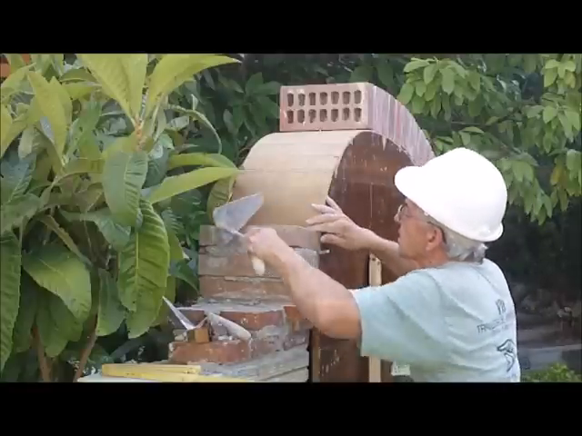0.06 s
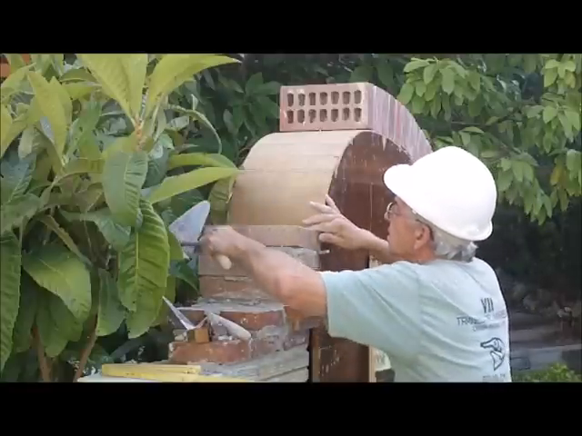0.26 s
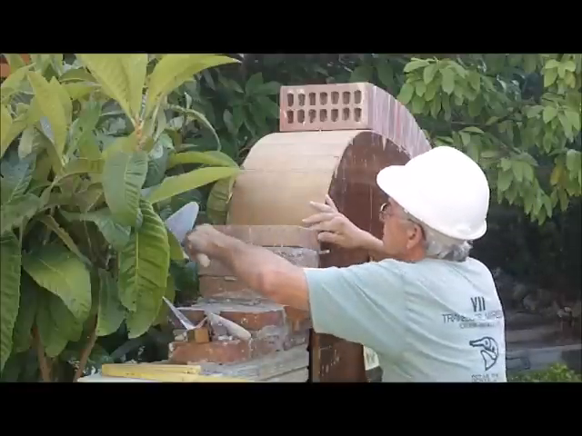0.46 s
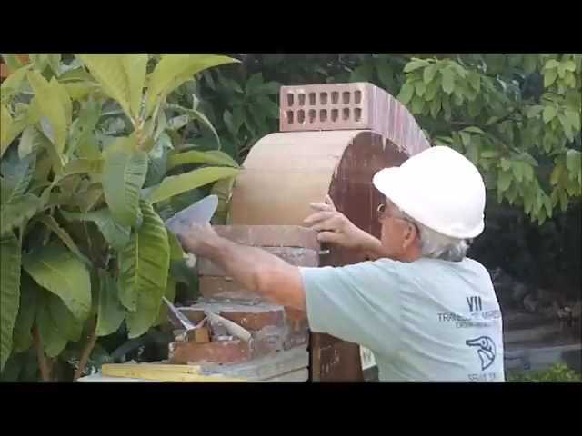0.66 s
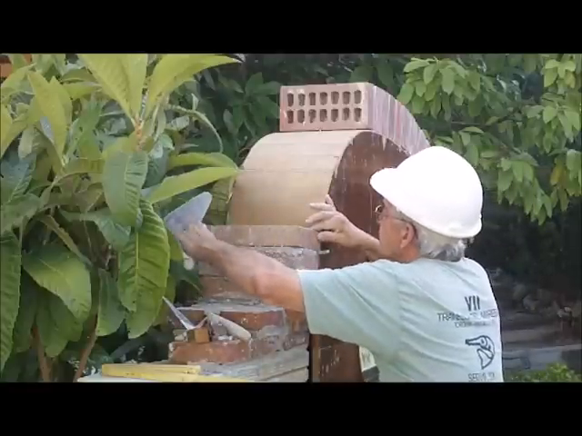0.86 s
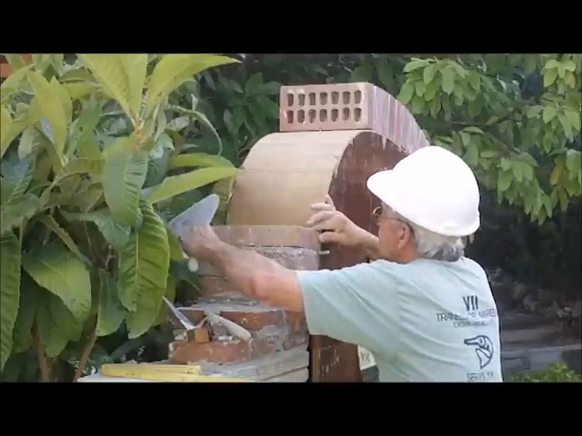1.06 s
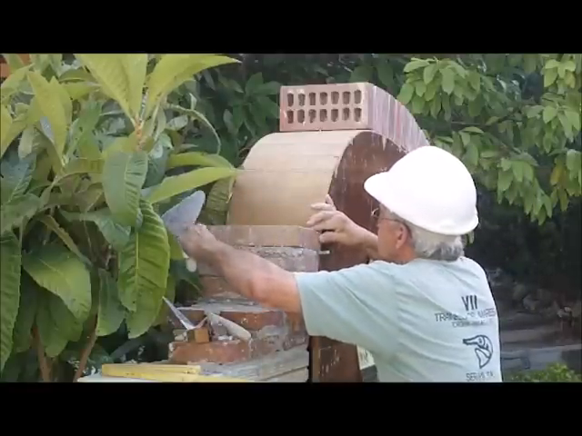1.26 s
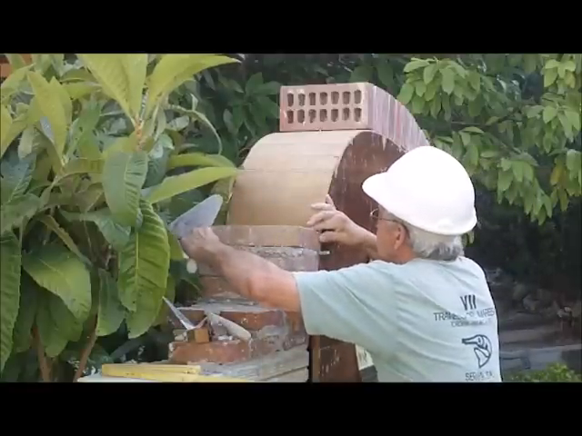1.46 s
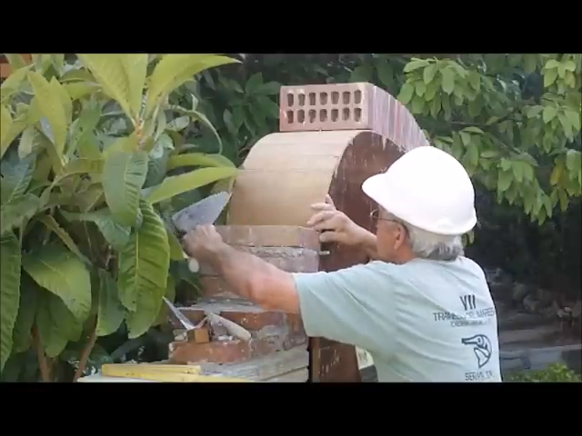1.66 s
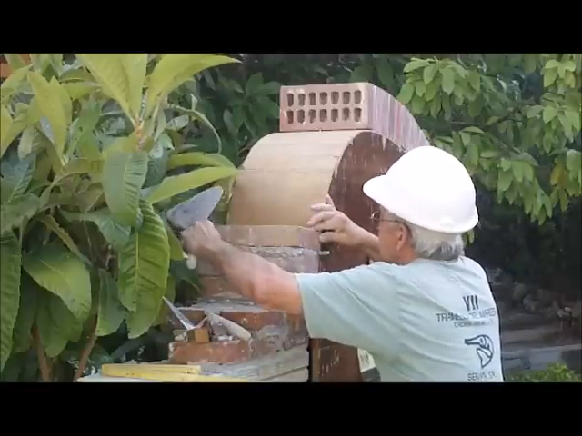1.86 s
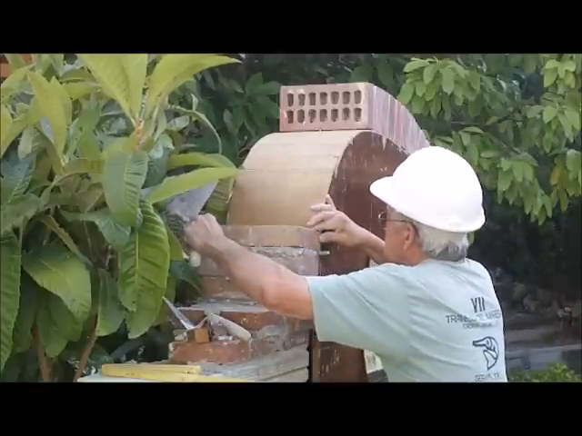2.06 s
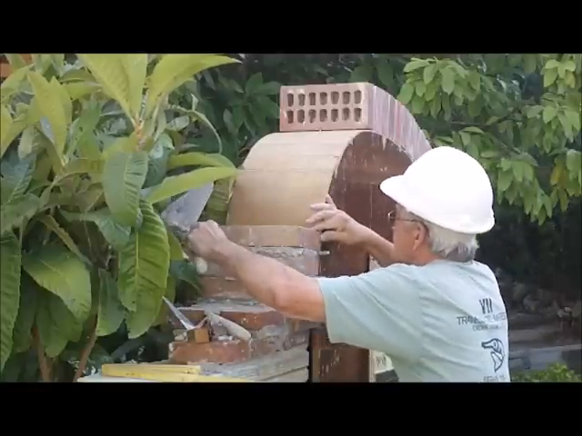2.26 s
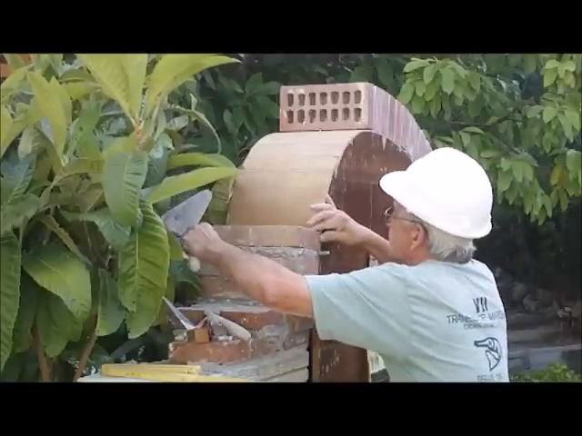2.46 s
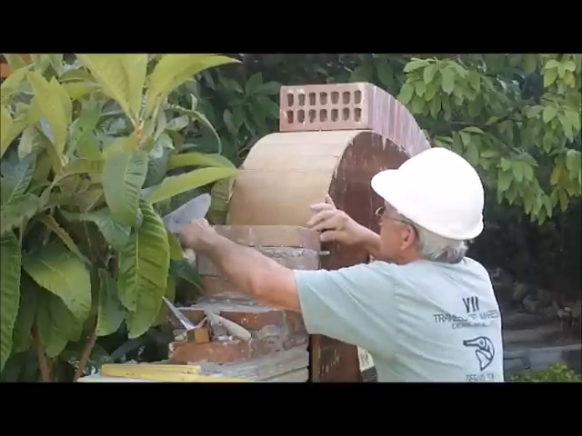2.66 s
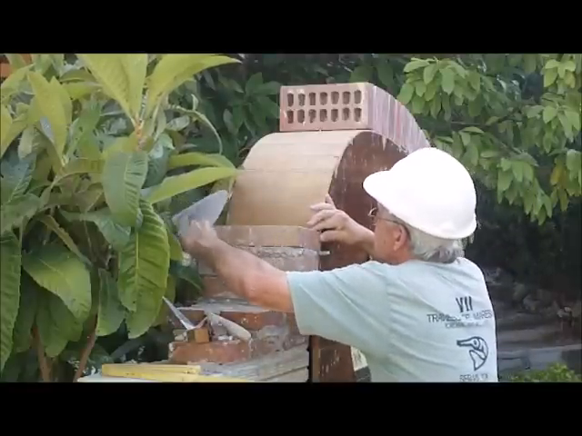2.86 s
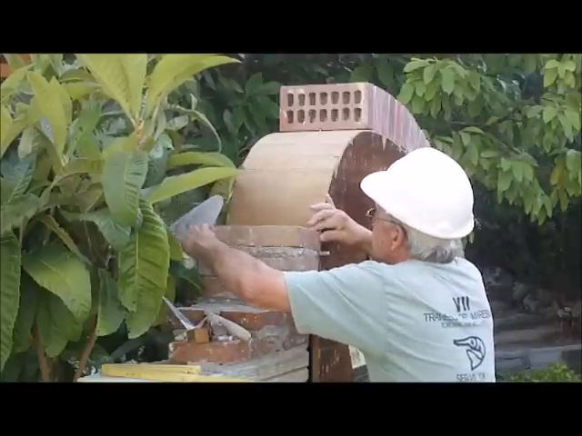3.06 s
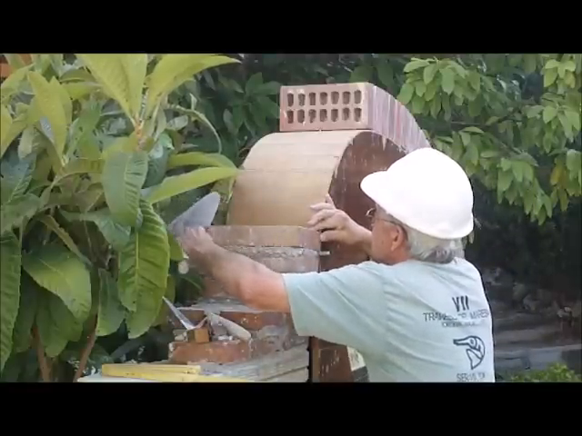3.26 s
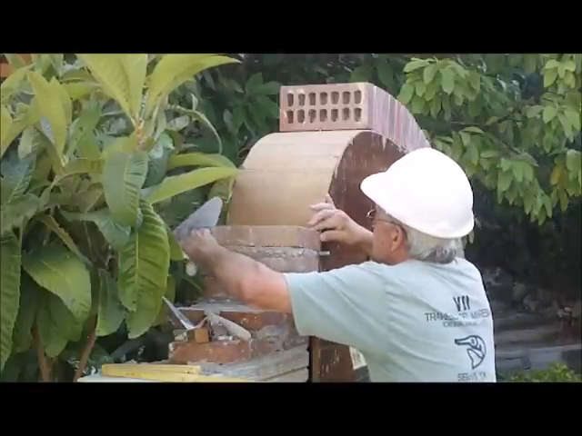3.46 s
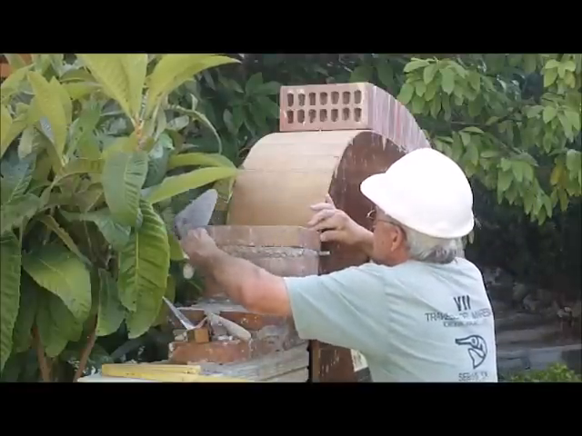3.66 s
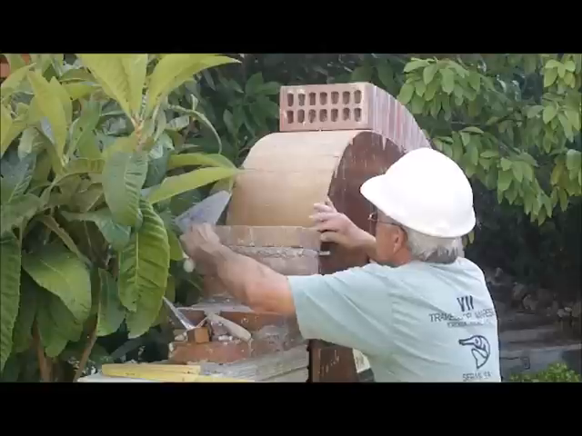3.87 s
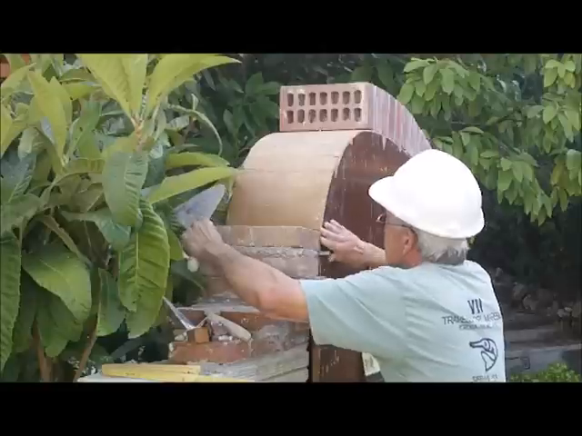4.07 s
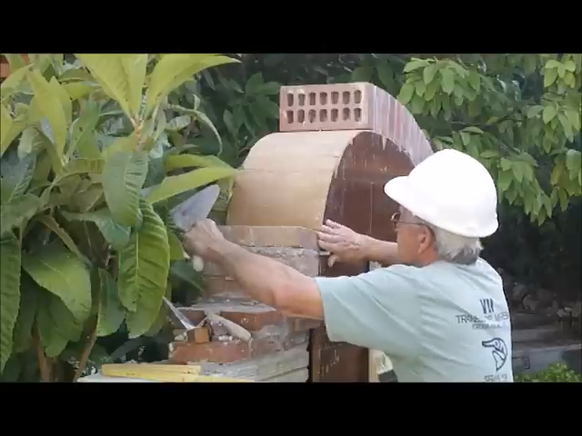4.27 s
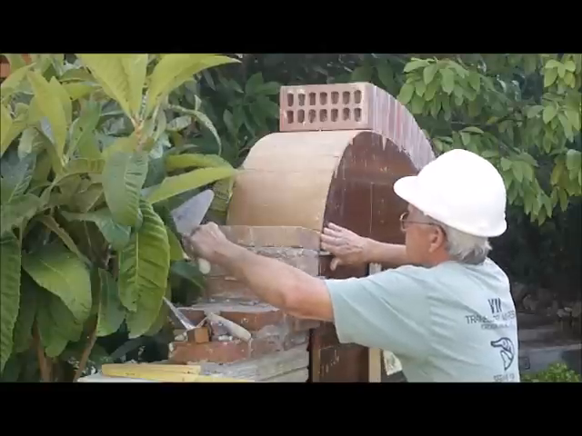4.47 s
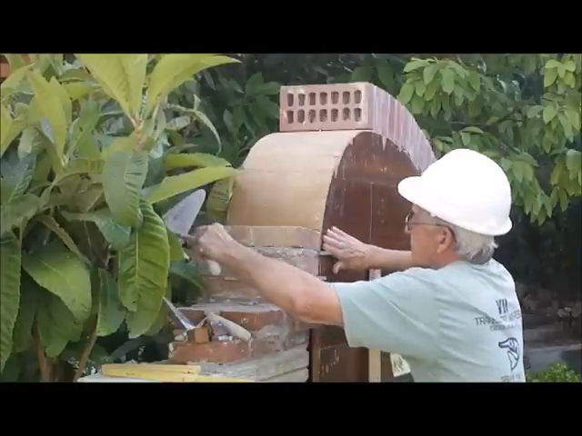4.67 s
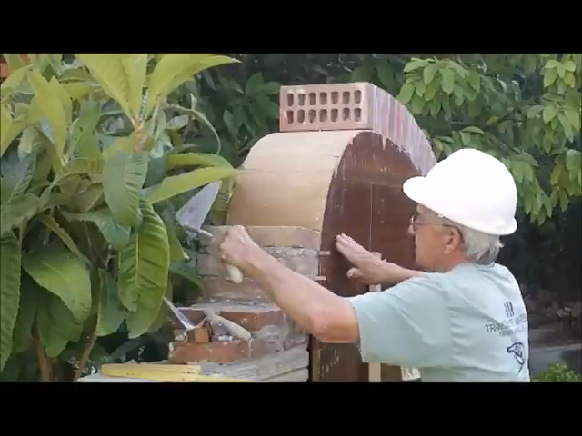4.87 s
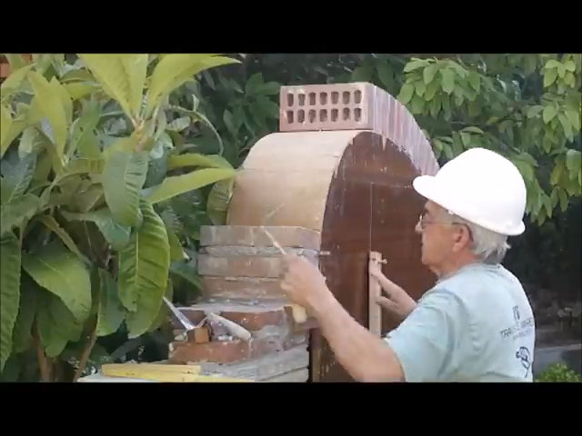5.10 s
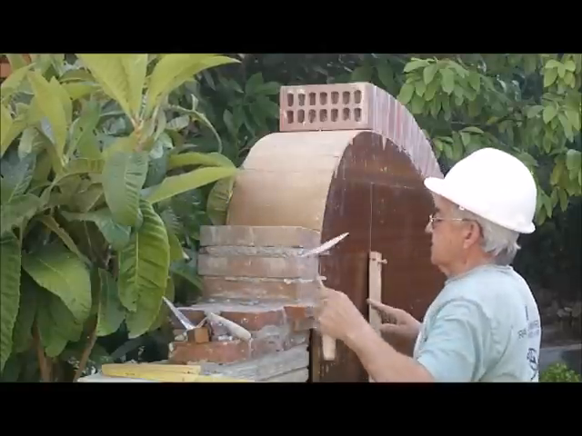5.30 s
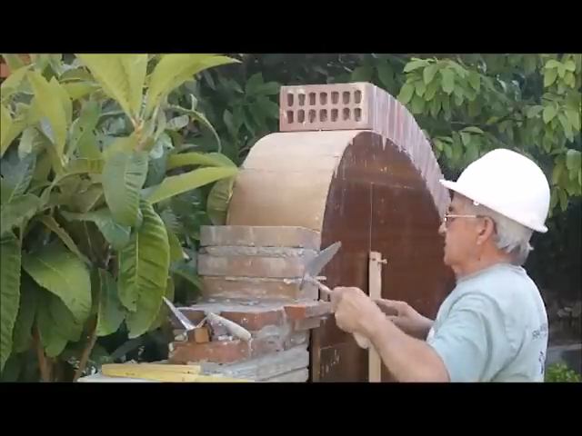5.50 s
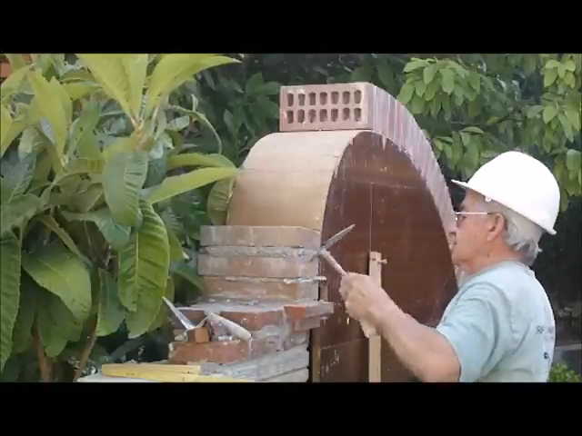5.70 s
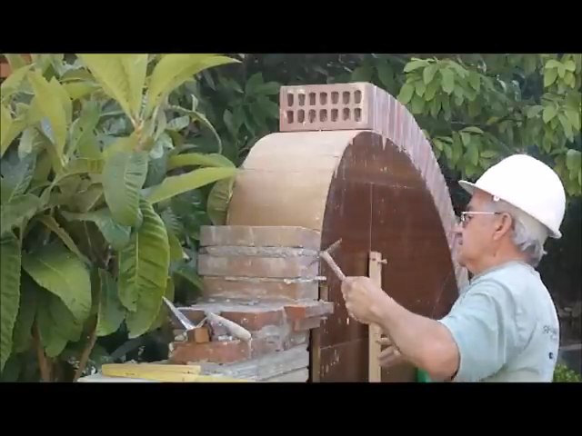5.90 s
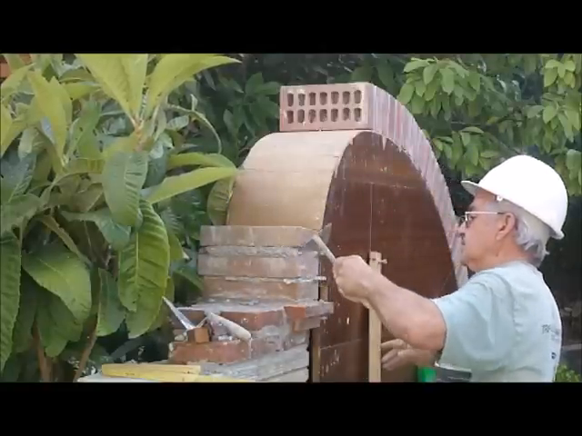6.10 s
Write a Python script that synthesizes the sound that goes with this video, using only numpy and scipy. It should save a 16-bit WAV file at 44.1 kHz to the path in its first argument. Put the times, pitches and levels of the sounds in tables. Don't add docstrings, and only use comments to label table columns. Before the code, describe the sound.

Steady soft hiss of leaves and circuitry, with a faint mains hum, surrounds close, centred trowel blows on brick. Two groups of four taps, about a third of a second apart, ring at a clear mid-high pitch with woody knock and a short steel shiver. The second group is stronger. A light, gritty metallic rattle follows, then minute mortar ticks and only background. Short garden echoes and a duller distant one trail each hit.

```python
import sys
import numpy as np
from scipy import signal
from scipy.fft import rfft, irfft, next_fast_len
from scipy.io import wavfile
from scipy.ndimage import map_coordinates

SR = 44100
rng = np.random.default_rng(int(sys.argv[2]) if len(sys.argv) > 2 else 0)


def volts_from_decibels(level):
    exponent = np.asarray(level, float) / 20
    return 10 ** exponent


def persist_wave(psi):
    counts = np.round(np.clip(psi, -1, 1) * 32767).astype(np.int16)
    wavfile.write(sys.argv[1], SR, np.atleast_2d(counts).T)


N = 270774

# [f/Hz, level/dB]
CONTACT_NOISE = [(250, -45), (600, -16), (1200, 6.5), (2800, -16.5), (3500, -18), (4500, -5.5), (6200, -8),
                 (7300, -15), (10500, -16), (13000, -14.5), (16400, -41)]


def unit(x):
    return x / np.sqrt(np.mean(x ** 2) + 1e-20)


def along(points, hz):
    f, v = np.transpose(points)
    return np.interp(np.log(hz + 1), np.log(f + 1), v)


def filtered(x, response):
    m = next_fast_len(x.shape[-1] + 4096)
    spectrum = rfft(x, m) * response(np.fft.rfftfreq(m, 1 / SR))
    return irfft(spectrum, m)[..., :x.shape[-1]]


def coloured(points, t):
    return unit(filtered(rng.standard_normal(len(t)), lambda f: volts_from_decibels(along(points, f))))


def wobble(rate_hz):
    knots = rng.standard_normal(int(N * rate_hz / SR) + 4)
    return map_coordinates(knots, [np.arange(N) * rate_hz / SR])


def ring(modes, t):
    scatter_db, scatter_pitch = 2, .006
    hz, db, t60 = np.transpose(modes)[:, :, None]
    luck = rng.standard_normal((2, len(modes), 1))
    envelope = volts_from_decibels(db + scatter_db * luck[0] - 60 * t / t60)
    waves = envelope * np.sin(2 * np.pi * hz * (1 + scatter_pitch * luck[1]) * t)
    return waves.sum(0) / np.linalg.norm(volts_from_decibels(db))


def contacts():
    # [t/s, force/dB, brick tone/dB (0 square, weak near the edge), steel/dB, hollow/dB]
    blows = [
        (0.7616, -26.5, -6, -7, -13.5),
        (1.1035, -27, 1, -1.5, -8.5),
        (1.4359, -22, -1, -3.5, -15),
        (1.7536, -22.5, -9, -12.5, -9),
        (2.8257, -20.5, -3.5, -7, -25),
        (3.1911, -16.5, 1.5, -8.5, -20.5),
        (3.529, -18, -3, -5, -17),
        (3.8327, -22.5, -16.5, -11, -7),
    ]
    # [flight/s, loss/dB, gain of the brick tone/dB]
    rebounds = [(.0275, -14, -3), (.0131, -2.5, 0.5), (.0185, -13, 4.5), (.0166, -4, 1.5),
                (0.017, -4.5, 3.5), (.0182, -8, -6.5), (.017, -6, 3.5), (0.015, -3.5, 5.5)]
    hop_s, hop_db, hop_tone_db = 0.0065, -3.5, -1.5
    square_knock_db, square_clack_db = -6.5, -5
    edge_knock, edge_clack = -0.79, 0.17
    rebound_hollow_db, rebound_knock_db, rebound_steel_db = -31, -1, -3.5
    for blow, rebound in zip(blows, rebounds):
        s, db, tone_db, steel_db, hollow_db = blow
        flight_s, loss_db, gain_db = rebound
        knock_db = square_knock_db - edge_knock * tone_db
        clack_db = square_clack_db - edge_clack * tone_db
        yield s, s, db, tone_db, hollow_db, knock_db, clack_db, steel_db
        light = (hollow_db + rebound_hollow_db, knock_db + rebound_knock_db,
                 clack_db, steel_db + rebound_steel_db)
        back_s, back_db, back_tone_db = s + flight_s, db + loss_db, tone_db + gain_db
        yield back_s, s, back_db, back_tone_db, *light
        yield back_s + hop_s, s, back_db + hop_db, back_tone_db + hop_tone_db, *light


def taps():
    # [f/Hz, t60/s, after-ring level/dB, after-ring t60/s]
    brick_tone = (1204, .072, -30, .7)
    # [f/Hz, level/dB, t60/s]
    overtones = [(1238, 18.5, 0.045), (1420, -25, 0.048), (1519, 15, 0.064), (1573, 4, 0.053),
                 (1797, -3, 0.059), (2060, 10, 0.052), (2195, 6, 0.074), (2300, -19, 0.036),
                 (2620, 6, 0.011), (2595, 11.5, 0.027), (2723, 13, 0.029), (2985, 12.5, 0.03),
                 (3270, 0.5, 0.09)]
    # [f/Hz, level/dB]
    mortar = [(500, -60), (700, 15), (1300, -5), (2000, 12), (2800, 8.5), (3300, -10.5), (3700, -26.5)]
    # [f/Hz, level/dB, t60/s]
    form_air = [(704, 0, .11), (445, -8, 0.025), (760, -1, 0.048)]
    # [f/Hz, level/dB, t60/s]
    form_wood = [(789, -5, 0.24), (850, 8.5, 0.09), (966, 12.5, 0.06), (1095, 2, 0.056)]
    # [f/Hz, level/dB, t60/s]
    blade = [(4000, 9, 0.04), (4160, -29, 0.085), (5150, 4, 0.024), (4900, -28, 0.022), (5380, 2.5, 0.069),
             (5170, -15, 0.057), (5240, 11, 0.016), (6650, 8.5, 0.017), (7830, -12, 0.015),
             (8090, 5.5, 0.039), (9400, -52.5, 0.01), (10500, 5, 0.029), (10700, 8, 0.02),
             (11600, -7, 0.012)]
    crunch_db, onset_s = -9, .00035
    out, t = np.zeros(N + SR), np.arange(SR * 2 // 5) / SR
    hz, t60, after_db, after_t60 = brick_tone
    for s, blow_s, db, tone_db, hollow_db, knock_db, clack_db, steel_db in contacts():
        decay = volts_from_decibels(-60 * t / t60) + volts_from_decibels(after_db - 60 * t / after_t60)
        tone = decay * np.sin(2 * np.pi * hz * (t + s - blow_s))
        crunch = volts_from_decibels(crunch_db - 60 * t / 0.054) * coloured(mortar, t)
        brick = volts_from_decibels(tone_db) * tone + volts_from_decibels(clack_db) * (ring(overtones, t) + crunch)
        form = volts_from_decibels(hollow_db) * ring(form_air, t) + volts_from_decibels(knock_db) * ring(form_wood, t)
        crack_decay = volts_from_decibels(-60 * t / 0.0097) + volts_from_decibels(-9 - 60 * t / 0.087)
        crack = volts_from_decibels(6.5) * coloured(CONTACT_NOISE, t) * crack_decay
        steel = volts_from_decibels(steel_db - 2.5) * (ring(blade, t) + crack)
        onset = 1 - np.exp(-t / onset_s)
        out[round(s * SR):][:len(t)] -= volts_from_decibels(db + 2.5) * (brick + form + steel) * onset
    return out[:N]


def rattle():
    # [t/s, peak level/dB]
    touches = [(4.1514, -38), (4.165, -38), (4.1764, -40), (4.1826, -45), (4.194, -40), (4.2036, -52),
               (4.2105, -38.5), (4.222, -41), (4.2302, -41), (4.246, -47), (4.268, -51), (4.31, -46)]
    # [f/Hz, level/dB, t60/s]
    body = [(697, -9, 0.14), (1242, 2, 0.082), (1495, -4, 0.046), (2070, -15, .04), (3740, -9, 0.082)]
    # [f/Hz, level/dB, t60/s]
    jingle = [(5300, 0, 0.044), (6300, -5, 0.04), (7900, 4, .04), (9600, -2, .05), (11300, -8, .04)]
    tip_hz, tip_rise_hz_per_s, tip_top_hz, tip_db = 2540, 3700, 2750, -3.5
    tip_waver = 0.021
    jingle_start_db, jingle_fade_db_per_s = 3.5, -230
    out, t = np.zeros(N + SR), np.arange(SR // 5) / SR
    for s, db in touches:
        since_s = s - touches[0][0]
        lifted_hz = min(tip_hz + tip_rise_hz_per_s * since_s, tip_top_hz)
        lifted_hz = lifted_hz * (1 + tip_waver * rng.standard_normal())
        jingle_db = jingle_start_db + jingle_fade_db_per_s * since_s
        tip = volts_from_decibels(tip_db) * ring([(lifted_hz, 0, .04)], t)
        touch = ring(body, t) + tip + volts_from_decibels(jingle_db) * ring(jingle, t)
        scrape = volts_from_decibels(-3 - 60 * t / .04) * coloured(CONTACT_NOISE, t)
        out[round(s * SR):][:len(t)] += volts_from_decibels(db - 4.0) * (touch + scrape)
    return out[:N]


def grit():
    # [t/s, level/dB, f/Hz]
    ticks = [
        (2.899, -41, 10300),
        (2.926, -42, 10400),
        (4.899, -40, 10700),
        (4.902, -42, 7070),
        (4.910, -46, 6900),
    ]
    out, t = np.zeros(N + SR), np.arange(SR // 20) / SR
    for s, db, hz in ticks:
        modes = [(.85 * hz, -2, .015), (hz, 0, .02), (1.2 * hz, -3, .015)]
        out[round(s * SR):][:len(t)] += volts_from_decibels(db) * ring(modes, t)
    return out[:N]


def surroundings(x):
    echo_s = (.064, .088, .1121, .1678)
    # [level/dB, thin below f/Hz, dull above f/Hz]
    walls = [
        (-11.5, 1160, 5000),
        (-21, 1540, 5900),
        (-30, 700, 4000),
        (-15, 780, 1500),
    ]
    # [f/Hz, t60/s]
    yard = [(300, 0.29), (1200, 0.69), (2500, 0.8), (6000, 0.18), (12000, 0.18)]
    # [f/Hz, level/dB]
    scatter = [(300, 3.5), (750, -10), (1050, -17), (1200, -22.5), (1400, -12), (2300, -9), (5000, -14),
               (12000, -4)]
    build_up_s = 0.0028

    def echoes(f):
        total = 0
        for s, (db, low_hz, top_hz) in zip(echo_s, walls):
            band = (1j * f / (low_hz + 1j * f) / (1 + 1j * f / top_hz)) ** 2
            total = total + volts_from_decibels(db) * np.exp(-2j * np.pi * f * s) * band
        return total

    out = np.pad(x + filtered(x, echoes), (0, SR))
    step = SR // 3
    for start in range(0, N, step):
        hz, t, z = signal.stft(rng.standard_normal(SR // 2), SR, nperseg=256)
        decay = volts_from_decibels(-60 * t / along(yard, hz)[:, None])
        tail = signal.istft(z * decay, SR, nperseg=256)[1]
        tail = tail * np.clip(np.arange(len(tail)) / SR / build_up_s, 0, 1)
        wet = signal.fftconvolve(x[start:start + step], tail / np.linalg.norm(tail))
        out[start:start + len(wet)] += filtered(wet, lambda f: volts_from_decibels(along(scatter, f)))
    return out[:N]


def ports(a, b):
    # [f/Hz, correlation]
    alike = [(60, .97), (200, .97), (350, .985), (600, .9995), (2500, .999), (4000, .94), (6000, .86),
             (9000, .76), (12000, .7), (16000, .62)]
    # [f/Hz, level/dB]
    tilt = [(60, -2.5), (150, -.5), (300, 0)]

    def shares(f):
        turn = np.arccos(np.clip(along(alike, f), -1, 1)) / 2
        return np.array([np.cos(turn), np.sin(turn)])

    mid, side = filtered(np.array([a, b]), shares)
    pair = np.array([mid + side, mid - side])
    return filtered(pair, lambda f: volts_from_decibels(along(tilt, f) * np.array([[.5], [-.5]])))


def hiss():
    # [t/s, level/dB]
    course = [(0.0, -56.5), (0.91, -52.5), (4.3, -52), (5.58, -53.5), (6.14, -52.5)]
    # [f/Hz, density/dB per Hz]
    spectrum = [(20, -33), (70, -2.5), (150, -5), (400, -6), (700, -2.5), (1700, -2), (4000, -3),
                (7500, -4), (11000, -5.5), (14700, -7), (16000, -13)]
    s, db = np.transpose(course)
    a, b = unit(filtered(rng.standard_normal((2, N)), lambda f: volts_from_decibels(along(spectrum, f))))
    level_db = np.interp(np.arange(N) / SR, s, db) + 2.13 + 0.37 * wobble(2.82)
    return volts_from_decibels(level_db) * ports(a, b)


def hum():
    # [f/Hz, rms level/dB]
    mains = [(50.0, -55.7), (120, -77)]
    # [f/Hz, density/dB per Hz]
    pressure = [(1, 0), (4, -1), (8, -6), (15, -13), (25, -17), (35, -16), (45, -18), (65, -26), (90, -60)]
    t = np.arange(N) / SR
    lines = 0
    for hz, db in mains:
        lines = lines + volts_from_decibels(db + 3 + 0.67 * wobble(9)) * np.sin(2 * np.pi * hz * t)
    drift = volts_from_decibels(-61.0) * coloured(pressure, t)
    return (lines + drift) * volts_from_decibels([[-1.45], [1.45]])


def scene():
    low_hz = 330
    work = surroundings(taps() + rattle() + grit())
    work = filtered(work, lambda f: (1j * f / (low_hz + 1j * f)) ** 4)
    return work + hiss() + hum()


def roll_off(x):
    return signal.sosfilt(signal.butter(12, 16430, fs=SR, output="sos"), x)


def record(dry):
    # [f/Hz, level/dB]
    top_band = [(15230, 0), (15330, -19), (16200, -30), (16500, -80)]
    lead_s = .000023

    def response(f):
        lead = np.exp(-1j * np.pi * f * lead_s * np.array([[1], [-1]]))
        return lead * volts_from_decibels(along(top_band, f))

    return roll_off(filtered(dry, response))


dry = scene()
out = record(dry)
persist_wave(out)
```